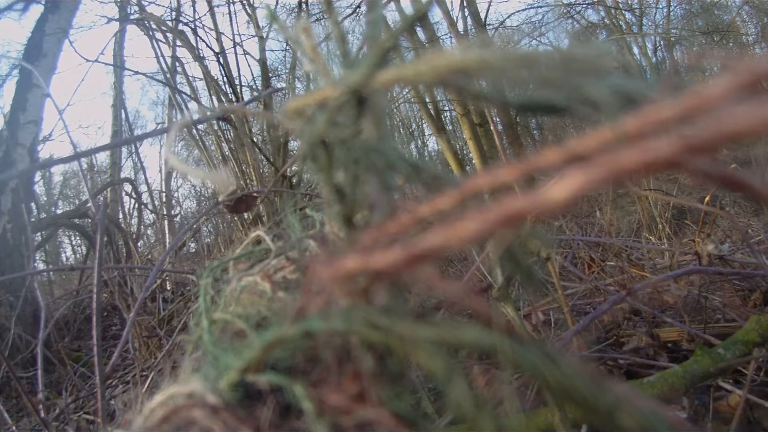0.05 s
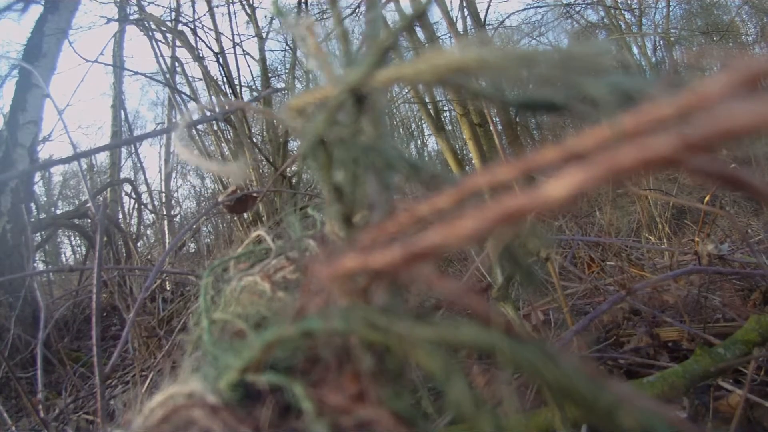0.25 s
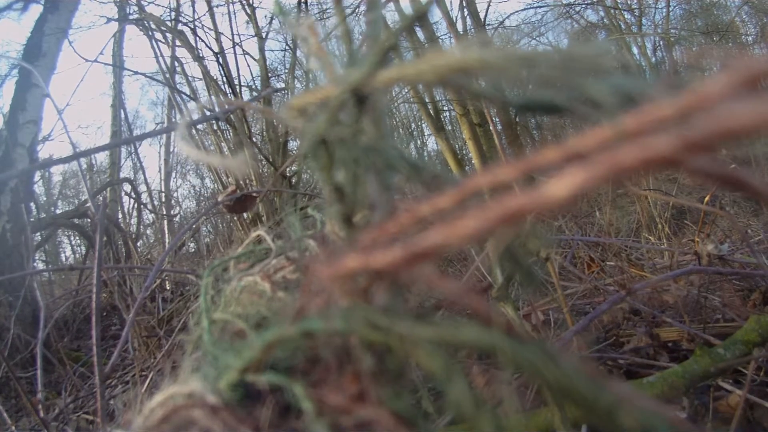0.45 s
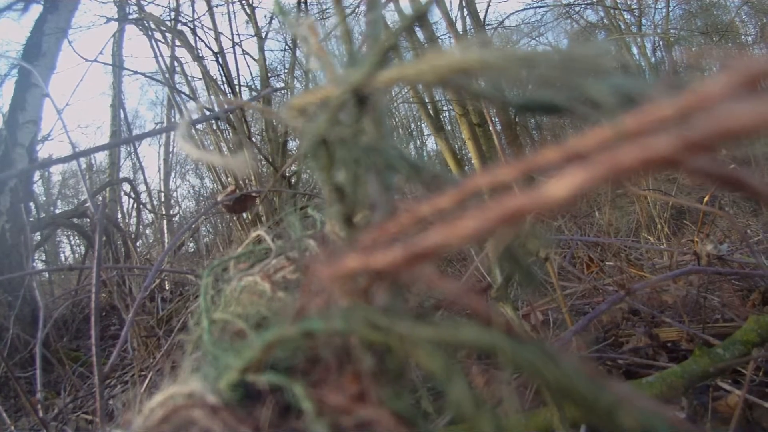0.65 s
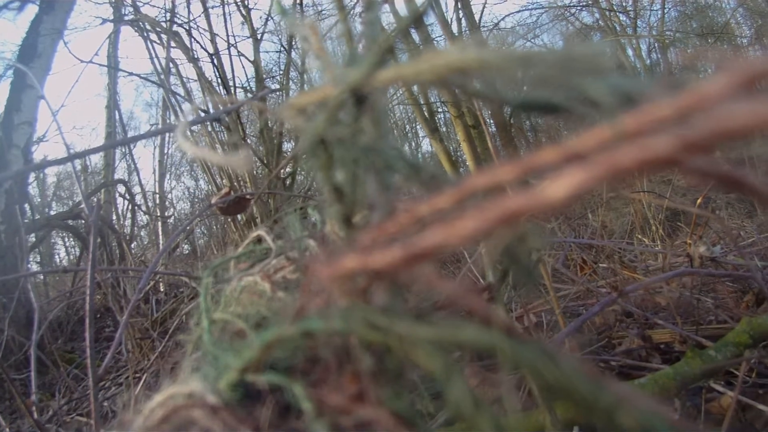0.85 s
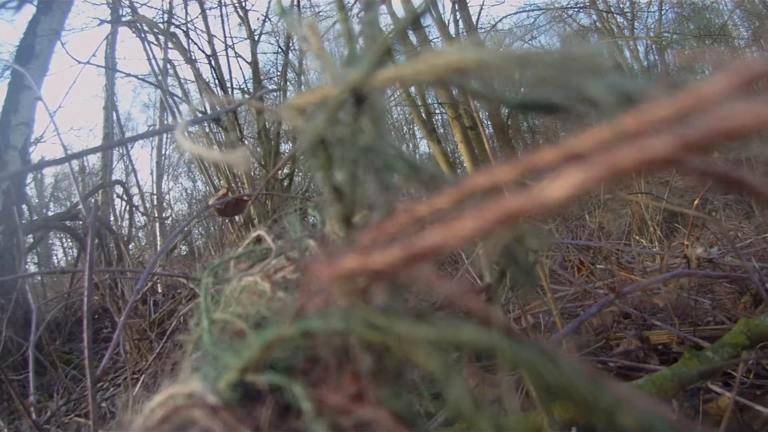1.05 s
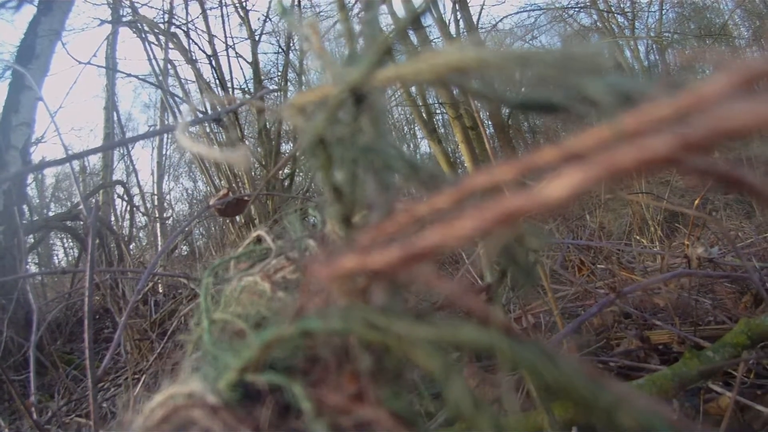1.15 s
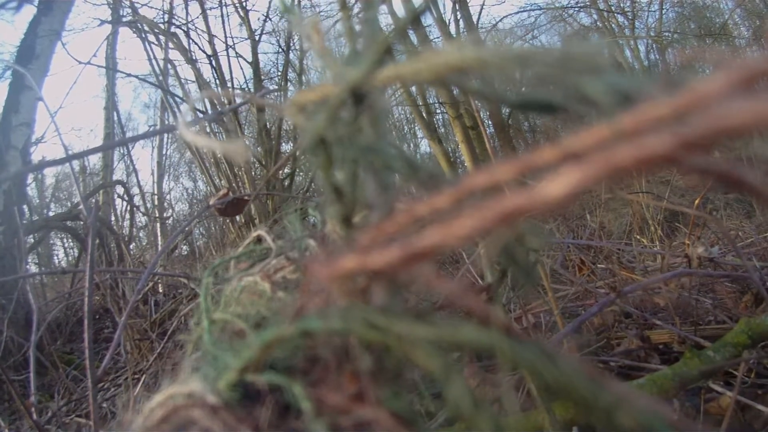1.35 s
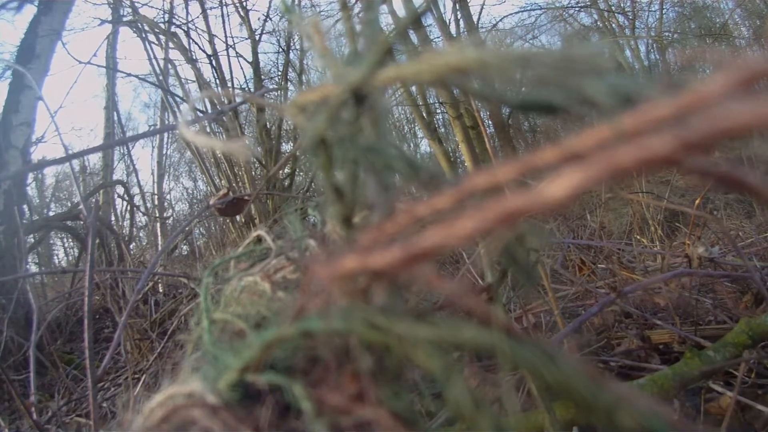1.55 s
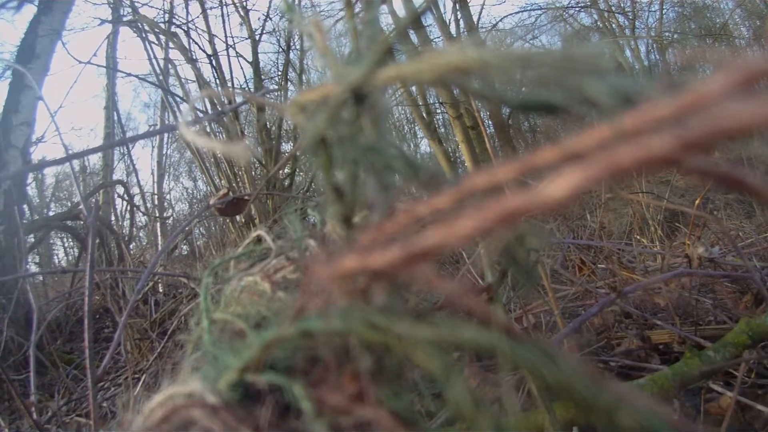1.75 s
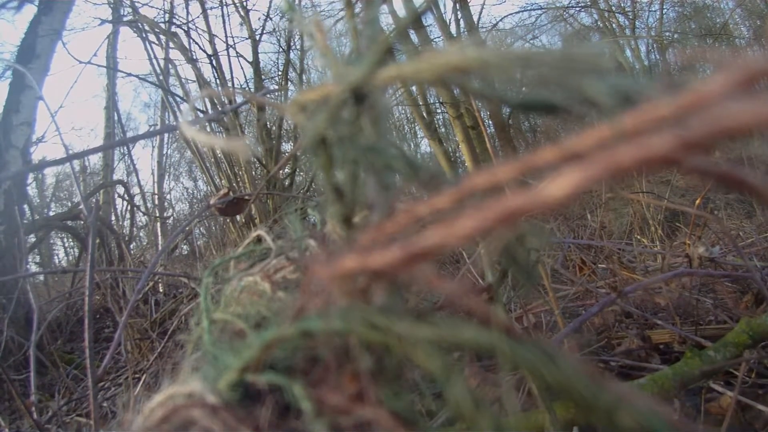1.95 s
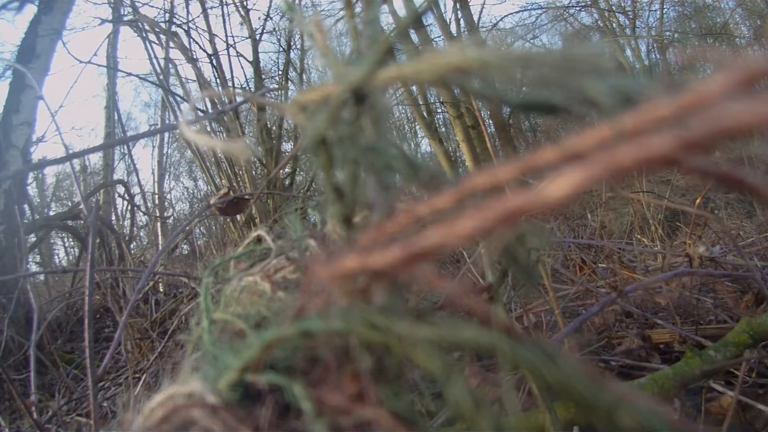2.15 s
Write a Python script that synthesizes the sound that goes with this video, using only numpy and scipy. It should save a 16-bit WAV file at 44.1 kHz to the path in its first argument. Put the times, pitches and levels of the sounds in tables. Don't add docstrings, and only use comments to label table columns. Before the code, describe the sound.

Two very close, dry, overloaded airsoft shots in a bare wood: trigger click, rasping gears, bright metallic crack with a pop, then latch clack; tree echoes, ticking twigs and a faint bird follow over quiet air.

```python
import sys
import numpy as np
from scipy import signal
from scipy.fft import rfft, irfft, next_fast_len
from scipy.io import wavfile
from scipy.ndimage import uniform_filter1d

SR = 44100
rng = np.random.default_rng(int(sys.argv[2]) if len(sys.argv) > 2 else 0)


def makeup_ratio(level_db):
    decades = np.asarray(level_db, float) / 20
    return 10 ** decades


def dump_mix(stems):
    frames = np.atleast_2d(stems).T
    limited = np.clip(frames, -1, 1)
    pcm = np.round(limited * 32767).astype(np.int16)
    wavfile.write(sys.argv[1], SR, pcm)


N = 97020
T = np.arange(N) / SR

# (motor start [s], piston release [s], gear level [dB], slam level [dB])
NEAR_SHOTS = [
    (0.187, 0.2718, -12, 4),
    (1.278, 1.3564, -11.5, 2.5),
]


def unit(x):
    return x / np.sqrt(np.mean(x ** 2) + 1e-20)


def along(points, hz):
    f, v = np.transpose(points)
    return np.interp(np.log(hz + 1), np.log(f + 1), v, left=v[0], right=v[-1])


def filtered(x, response):
    m = next_fast_len(x.shape[-1] + 8192)
    spectrum = rfft(x, m) * response(np.fft.rfftfreq(m, 1 / SR))
    return irfft(spectrum, m)[..., :x.shape[-1]]


def resonances(f, table):
    power = sum(np.abs(makeup_ratio(db) * f * width / (c * c - f * f + 1j * f * width + 1e-9)) ** 2
                for c, width, db in table)
    m = 2 * (len(f) - 1)
    cepstrum = irfft(np.log(power + 1e-10) / 2, m)
    cepstrum[1:m // 2] *= 2
    cepstrum[m // 2 + 1:] = 0
    return np.exp(rfft(cepstrum))


def tilt(hz, db_per_octave):
    return makeup_ratio(db_per_octave * np.log2(np.clip(hz, 200, 7000) / 4000))


def noise(spectrum, count=N):
    white = rng.standard_normal(count)
    return unit(filtered(white, lambda hz: makeup_ratio(along(spectrum, hz)) * (hz > 15)))


def fade(t, t60, attack):
    u = np.maximum(t, 0)
    return makeup_ratio(-60 * u / max(t60, 1e-3)) * (1 - np.exp(-u / max(attack, 1e-5)))


def bursts(table, colour):
    focus_db, focus_width = 7, .25
    out = np.zeros(N + 8192)
    t = np.arange(8192) / SR
    for s, db, t60, tilt_db, hz in table:
        focus = [(hz, focus_width * hz, focus_db)]
        crackle = unit(filtered(rng.standard_normal(len(t)),
                                lambda f: colour(f) * tilt(f, tilt_db) * (1 + resonances(f, focus))))
        out[round(s * SR):][:len(t)] += makeup_ratio(db) * crackle * fade(t, t60, .0007)
    return out[:N]


def open_air():
    # (frequency [Hz], level [dB])
    air_colour = [(25, -8), (60, -8.5), (300, -14), (700, -16.5), (1200, -13), (5300, -21.5), (8000, -23),
                  (15500, -28.5)]
    # (frequency [Hz], side over middle [dB])
    air_spread = [(60, -2.5), (110, -4), (200, -11), (380, -12.5), (700, -11), (1290, -23.5), (2380, -21.5),
                  (4400, -14.5), (8120, -7), (15000, -1)]
    level = makeup_ratio(-54.5)
    middle = level * noise(air_colour)
    side = level * filtered(noise(air_colour), lambda hz: makeup_ratio(along(air_spread, hz)))
    return middle, side


def bird():
    # (time [s], length [s], pitch [Hz], level [dB])
    calls = [
        (1.585, .13, 2750, -52),
        (1.62, .09, 3050, -57),
        (1.63, .11, 2330, -55),
        (1.64, .07, 4300, -57),
        (1.94, .06, 5220, -57),
        (.695, .04, 1800, -54),
    ]
    out = np.zeros(N)
    for s, length, hz, db in calls:
        swell = np.exp(-((T - s - length / 2) / (.5 * length)) ** 2)
        blur = .06 * np.cumsum(rng.standard_normal(N))
        out += makeup_ratio(db) * swell * np.sin(2 * np.pi * hz * T + blur)
    return out


def far_shots():
    # (time [s], level [dB], swell [s], t60 [s], tilt [dB per octave])
    answers = [
        (-.1, -32.5, 0.056, 0.56, 6.5),
        (0.076, -41.5, 0.0018, 1, 7.5),
        (0.68, -43, 0.0027, 0.21, 2.5),
        (0.723, -35, 0.0034, 0.24, 3),
        (0.741, -34, 0.012, 0.99, 0.5),
        (1.628, -46.5, 0.0069, 0.46, 6.5),
        (1.848, -51, 0.0076, .8, 8),
    ]
    # (frequency [Hz], level [dB])
    tree_colour = [(300, -41), (900, -31), (1800, -2), (3500, -2), (5200, 1.5), (7200, -8.5), (9000, -23.5),
                   (14000, -38)]
    out = np.zeros(N)
    for s, db, swell, t60, tilt_db in answers:
        grain = makeup_ratio(1.9 * unit(uniform_filter1d(rng.standard_normal(N), size=150)))
        wash = unit(filtered(noise(tree_colour), lambda f: tilt(f, tilt_db)))
        out += makeup_ratio(db) * wash * grain * fade(T - s, t60, swell)
    return out


def twigs():
    # (time [s], peak level [dB], t60 [s], tilt [dB per octave], focus [Hz])
    ticks = [(.071, -36, .03, 2, 3500), (.0745, -25, .018, 1, 3600), (.618, -42, .015, 2, 5500),
             (.629, -44, .012, -6, 1300), (.655, -44, .012, -6, 1500), (.676, -37, .025, 1, 4500),
             (.7465, -41, .025, -3, 800), (.771, -34, .03, 2, 5500), (.841, -37, .015, -2, 2000),
             (.975, -37, .015, 3, 5000), (1.618, -42, .02, 2, 4300), (1.7185, -33, .016, -2, 1750),
             (1.8483, -33, .018, 2, 5000), (1.855, -40, .012, -4, 1080), (1.8667, -36, .014, 2, 4500),
             (1.876, -36, .02, 3, 5500), (1.8895, -42, .015, 1, 2800), (1.9151, -39, .014, 2, 5500)]
    # (frequency [Hz], level [dB])
    snap_colour = [(290, -40), (500, -18.5), (1080, -2.5), (1780, -5.5), (2290, -11.5), (4590, -5),
                   (14000, -37)]
    return bursts(ticks, lambda f: makeup_ratio(along(snap_colour, f)))


def trunk_echo(x):
    # (frequency [Hz], t60 [s])
    echo_decay = [(300, 0.11), (2000, 1), (6000, 0.94), (14000, 0.074)]
    hz, t, z = signal.stft(rng.standard_normal(SR), SR, nperseg=256)
    dying = z * makeup_ratio(-60 * t / along(echo_decay, hz)[:, None])
    tail = signal.istft(dying, SR, nperseg=256)[1]
    return makeup_ratio(-31.5) * signal.fftconvolve(x, tail / np.linalg.norm(tail))[:N]


def stock():
    # (frequency [Hz], level [dB], t60 [s])
    stock_modes = [(249, 2, 0.045), (251.6, -8, .16), (396.4, -1, 0.04), (700, -5.5, .025)]
    # (time [s], level [dB])
    knocks = [
        (.189, -31.5),
        (0.266, -18.5),
        (0.312, -28.5),
        (0.401, -21),
        (1.277, -27.5),
        (1.316, -35.5),
        (1.347, -22),
        (1.356, -18.5),
        (1.39, -19),
        (1.463, -23.5),
    ]
    # (time [s], level [dB], t60 [s])
    thumps = [
        (0.265, -28, 0.16),
        (.398, -23.5, 0.035),
        (1.349, -19.5, 0.087),
    ]
    # (frequency [Hz], level [dB], t60 [s])
    long_stock_tones = [(755, -58.5, 2), (1148, -58.5, 2)]
    latch_times = [
        .4,
        1.465,
    ]
    out = np.zeros(N)
    for s, db in knocks:
        for hz, mode_db, t60 in stock_modes:
            out += makeup_ratio(db + mode_db) * np.sin(2 * np.pi * hz * (T - s)) * fade(T - s, t60, 0.0034)
    for s, db, t60 in thumps:
        out += makeup_ratio(db) * np.sin(2 * np.pi * 100.3 * (T - s)) * fade(T - s, t60, 0.0053)
    for s in latch_times:
        for hz, db, t60 in long_stock_tones:
            out += makeup_ratio(db) * np.sin(2 * np.pi * hz * T) * fade(T - s, t60, 0.0027)
    return out


def metal_contacts():
    # (time [s], peak level [dB], t60 [s], tilt [dB per octave], focus [Hz])
    first_contacts = [(.1522, -32, .04, -1, 3000), (.1865, -32, .02, 0, 4600), (.1893, -4, .014, 0, 5600),
                      (.2665, -7, .012, 0, 3400), (.2692, -7, .01, 2, 6500), (.280, 3, .035, 0, 3800),
                      (.289, -2, .03, 2, 6200), (.304, -2, .014, -1, 4000), (.314, -5, .015, 1, 5900),
                      (.320, -4, .014, 1, 5900), (.345, -15, .015, 0, 5900), (.36, -35, .5, 2, 5800),
                      (.396, -20, .02, 0, 2000), (.387, -27, .012, 3, 5800), (.391, -25, .012, 3, 5800),
                      (.3985, 4, .018, 2, 5400), (.399, 3, .016, 0, 3100), (.4015, -1, .012, 1, 2000),
                      (.419, -22, .02, 1, 6000), (.436, -30, .015, 1, 5500), (.444, -32, .01, 3, 6000),
                      (.4045, -4, .018, 1, 5500), (.407, -9, .016, -1, 1150), (.411, -22, .09, 0, 5800),
                      (.425, -18, .02, 0, 5600), (.4745, -16, .01, 1, 4500)]
    second_contacts = [(1.221, -42, .015, 2, 5000), (1.2452, -28, .018, 0, 4000),
                       (1.253, -28, .018, -1, 3000), (1.257, -47, .6, 0, 2500), (1.2745, -30, .02, 1, 4600),
                       (1.277, -5, .018, 0, 4300), (1.354, 0, .012, 1, 4600), (1.364, 3, .025, 0, 3000),
                       (1.375, -2, .015, 1, 6300), (1.389, -4, .02, -1, 3900), (1.416, -16, .02, -3, 900),
                       (1.400, -7, .015, 0, 3500), (1.459, -19, .03, 0, 4000), (1.4635, -8, .014, 1, 5800),
                       (1.4642, -13, .014, 0, 3500), (1.4645, -13, .022, -1, 1900),
                       (1.472, -17, .014, 1, 5800), (1.477, -26, .015, -3, 2000)]
    # (frequency [Hz], width [Hz], level [dB])
    shell_modes = [(900, 900, -7.5), (1900, 350, -2.5), (2820, 1100, -6.5), (3870, 550, -8),
                   (4500, 540, -4.5), (5657, 590, -6), (7600, 7400, -8.5), (9400, 1500, -18.5),
                   (13000, 1700, -25.5)]
    roll_hz = 10500

    def shell(f):
        return resonances(f, shell_modes) / (1 + (f / roll_hz) ** 6) ** .5

    return bursts(first_contacts, shell) + bursts(second_contacts, shell)


def gearbox():
    # (frequency [Hz], width [Hz], level [dB])
    case_modes = [(286, 400, -17), (882, 130, -3.5), (1300, 160, -10), (2000, 420, -6.5),
                  (2440, 1800, -10.5), (3270, 720, -5.5), (3948, 320, -3), (4514, 120, 1), (5670, 350, 2),
                  (6240, 740, -2), (6800, 610, -6), (8000, 970, -13.5), (9970, 1300, -14.5),
                  (12000, 4000, -29.5)]
    mesh_start_hz, mesh_top_hz = 880, 1640
    spin_lag_s, spin_up_s = .025, .015
    tooth_scatter_db, tooth_jitter, grit = 3, .4, 1.3
    case_low_hz, bright_hz, dull_db_per_s = 200, 7400, 93.5
    start_db, rise_s = -16, 0.03
    coast_s, coast_db_per_s, judder_db = 0.058, 601, .6
    rack_hz, rack_db, rack_scatter_db = 140, 7, 1.5
    rack_ring_hz, rack_width_hz = 5800, 900
    whine_db, whine_third_db = -5, -10.5
    whine_at_s, whine_width_s = .047, .014

    out = np.zeros(N)
    for start, release, db, _ in NEAR_SHOTS:
        t = T - start
        since_release = T - release
        spin = np.exp(-np.maximum(t - spin_lag_s, 0) / spin_up_s)
        mesh_hz = mesh_top_hz - (mesh_top_hz - mesh_start_hz) * spin
        turns = np.cumsum(mesh_hz) / SR

        rough = turns + tooth_jitter * 4 * uniform_filter1d(rng.standard_normal(N), size=16)
        tooth_db = tooth_scatter_db * np.clip(rng.standard_normal(N), -2, 2)
        teeth = (np.diff(np.floor(rough), prepend=0) > 0) * makeup_ratio(tooth_db)
        strikes = unit(teeth) + grit * rng.standard_normal(N)
        body = unit(filtered(strikes, lambda f: resonances(f, case_modes)
                             / (1 + (case_low_hz / (f + 1)) ** 4)))

        treble = filtered(body, lambda f: 1 / (1 + (bright_hz / (f + 1)) ** 10))
        body = body - treble * (1 - makeup_ratio(-dull_db_per_s * np.abs(since_release)))

        level_db = start_db * np.clip(1 - t / rise_s, 0, 1)
        level_db = level_db - coast_db_per_s * np.maximum(since_release - coast_s, 0)
        level_db = level_db + judder_db * unit(uniform_filter1d(rng.standard_normal(N), size=90))

        tooth_phase = rack_hz * t % 1
        bite_db = rack_scatter_db * rng.standard_normal(400)[(rack_hz * T).astype(int)]
        ring = filtered(body, lambda f: np.exp(-((f - rack_ring_hz) / rack_width_hz) ** 2))
        rack_gain = makeup_ratio(uniform_filter1d(rack_db * (.5 - tooth_phase) + bite_db, size=40))
        body = body + ring * (rack_gain - 1)

        tone = np.sin(2 * np.pi * turns) + makeup_ratio(whine_third_db) * np.sin(3 * 2 * np.pi * turns)
        whine = makeup_ratio(whine_db) * np.exp(-((t - whine_at_s) / whine_width_s) ** 2) * tone
        out += makeup_ratio(db) * (t > 0) * (makeup_ratio(level_db) * body + whine)
    return out


def piston():
    ring_hz, ring_width_hz, ring_hold_s, ring_t60 = 5793, 500, .007, 0.016
    pop_after_s, pop_hz, pop_db, pop_t60 = 0.0089, 1097, 4.5, 0.0075
    puff_hz, puff_db = 87, -13
    out = np.zeros(N)
    for _, release, _, db in NEAR_SHOTS:
        t = T - release
        drift = np.cumsum(rng.standard_normal(N)) * np.sqrt(ring_width_hz / SR)
        ring = np.sin(2 * np.pi * ring_hz * t + drift) * fade(t, 9, 0.00013)
        ring = ring * makeup_ratio(-60 * np.maximum(t - ring_hold_s, 0) / ring_t60)
        p = t - pop_after_s
        pop = makeup_ratio(pop_db) * np.sin(2 * np.pi * pop_hz * p) * fade(p, pop_t60, 0.00023)
        puff = makeup_ratio(puff_db) * np.sin(2 * np.pi * puff_hz * t) * fade(t, 0.036, 0.007)
        out += makeup_ratio(db) * (ring + pop + puff)
    return out


def scene():
    # (frequency [Hz], side over middle [dB])
    gun_spread = [(40, -7), (100, -8), (200, -11), (350, -16), (700, -23), (1400, -29), (2500, -50),
                  (16000, -50)]
    works = gearbox() + metal_contacts()
    works = filtered(works, lambda f: 1 / (1 + 1j * f / 11110) ** 1.63)
    mid = works + piston() + stock() + trunk_echo(works) + twigs() + far_shots() + bird()
    side = filtered(mid, lambda hz: makeup_ratio(along(gun_spread, hz)) * np.exp(1.3j))
    air, air_side = open_air()
    return np.array([mid + air + side + air_side, mid + air - side - air_side])


def low_pass(x):
    return signal.sosfilt(signal.butter(12, 20000, fs=SR, output="sos"), x)


def record(dry):
    band_hz, clip_top, clip_hard = 15400, 1.0, 51
    spill_db = -11
    x = filtered(dry, lambda hz: hz < band_hz)
    x = x / (1 + np.abs(x / clip_top) ** clip_hard) ** (1 / clip_hard)
    x = filtered(x, lambda hz: np.where(hz < band_hz, 1, makeup_ratio(spill_db)))
    return low_pass(x)


dry = scene()
out = record(dry)
dump_mix(out)
```